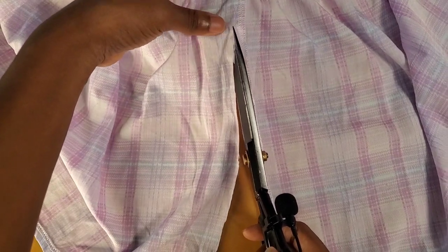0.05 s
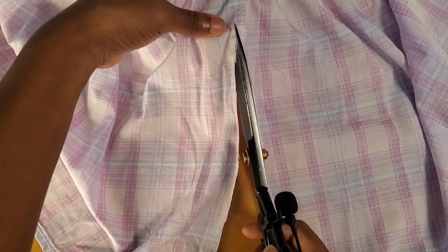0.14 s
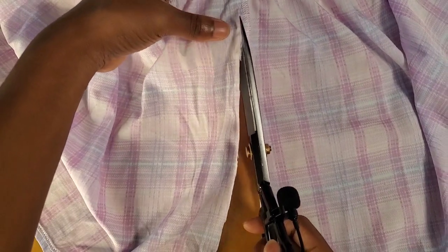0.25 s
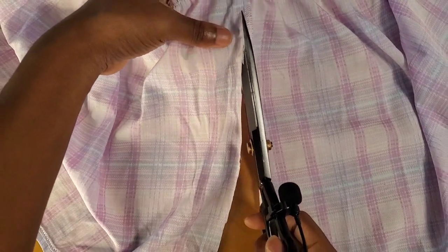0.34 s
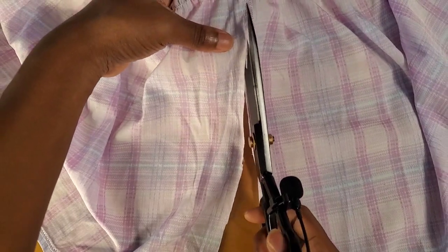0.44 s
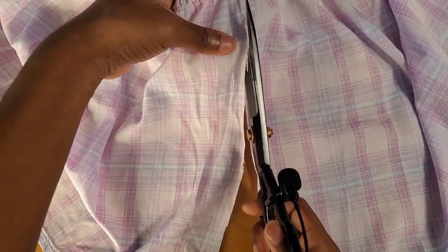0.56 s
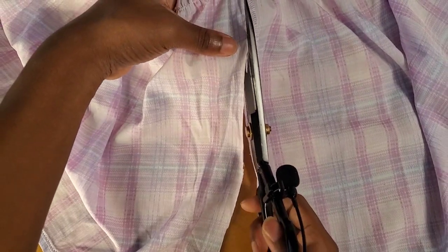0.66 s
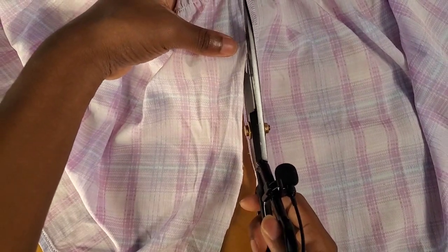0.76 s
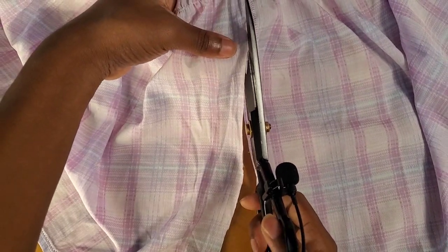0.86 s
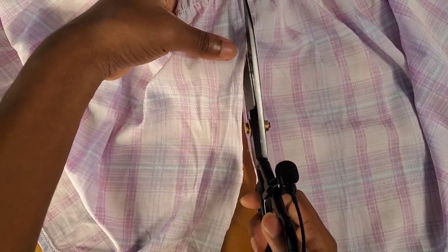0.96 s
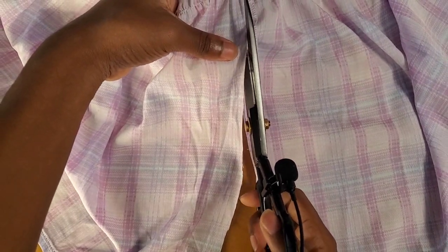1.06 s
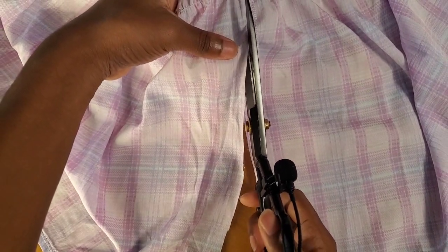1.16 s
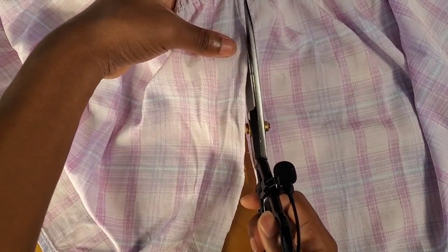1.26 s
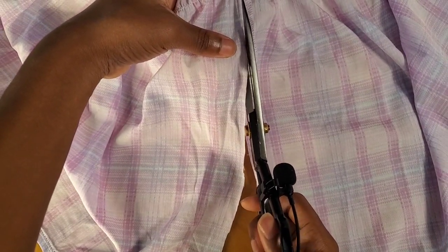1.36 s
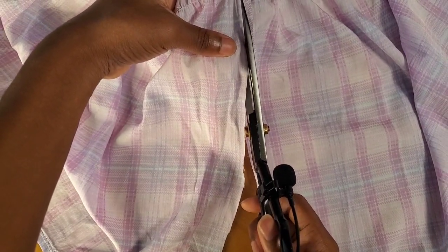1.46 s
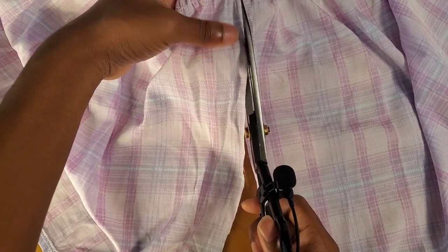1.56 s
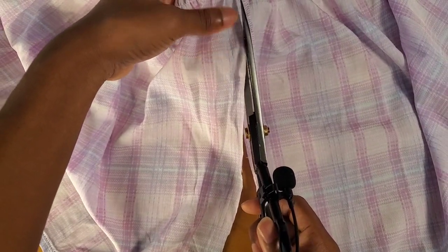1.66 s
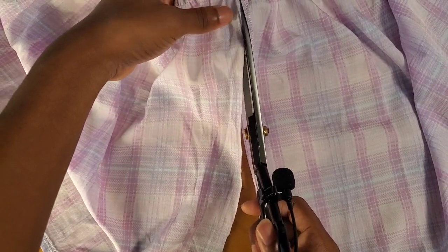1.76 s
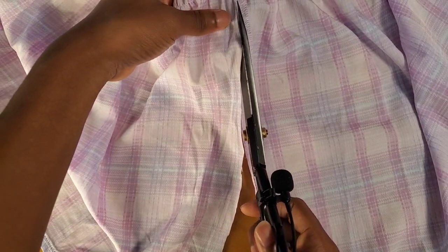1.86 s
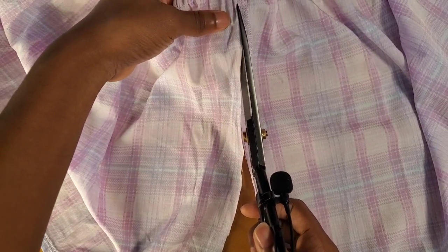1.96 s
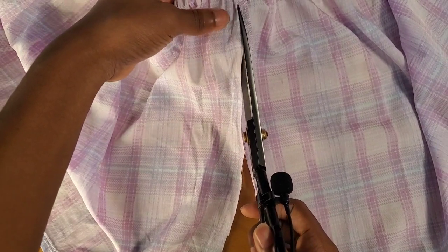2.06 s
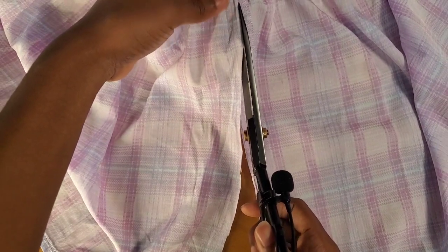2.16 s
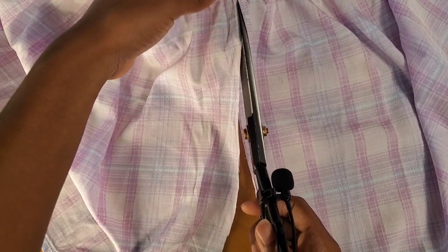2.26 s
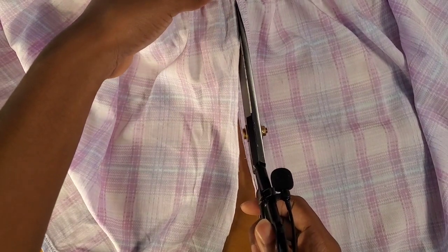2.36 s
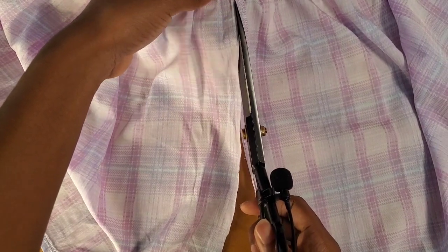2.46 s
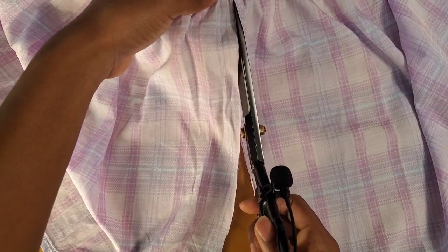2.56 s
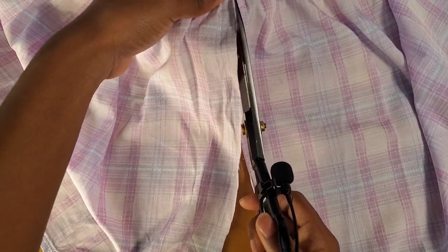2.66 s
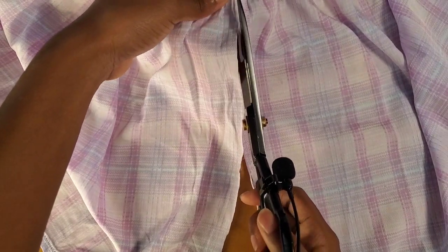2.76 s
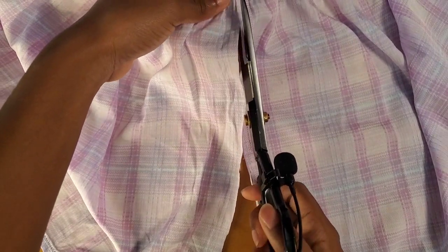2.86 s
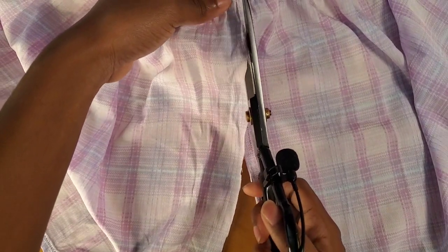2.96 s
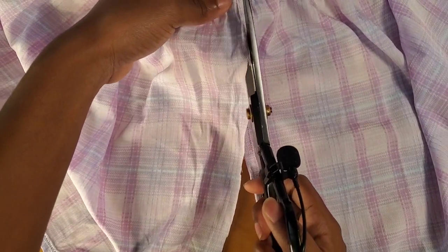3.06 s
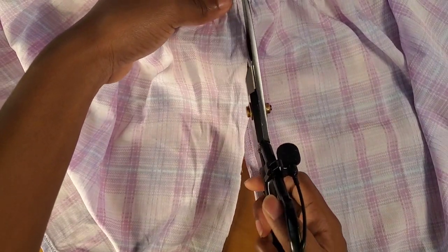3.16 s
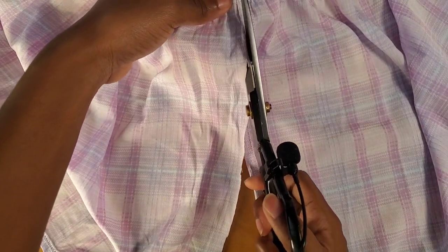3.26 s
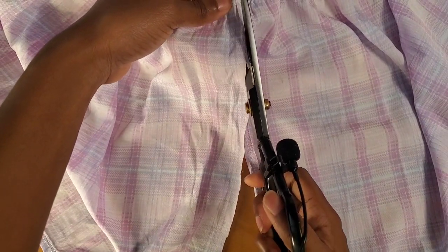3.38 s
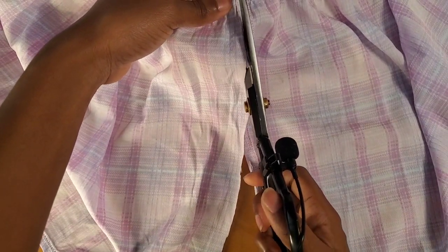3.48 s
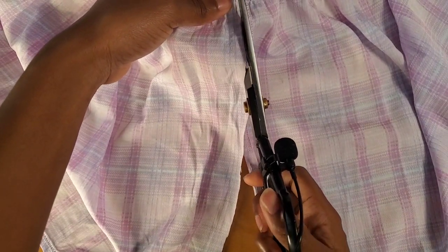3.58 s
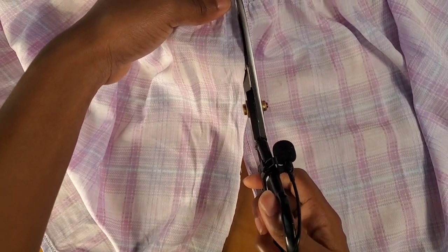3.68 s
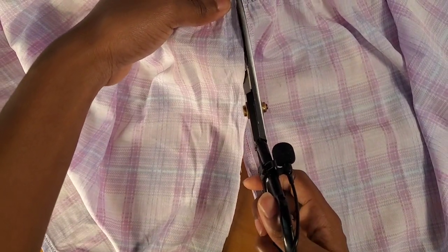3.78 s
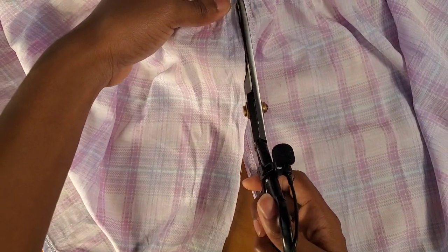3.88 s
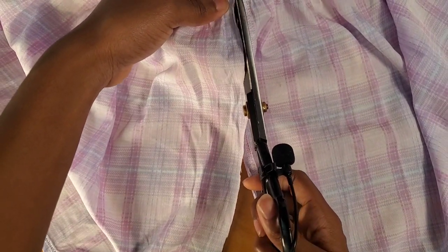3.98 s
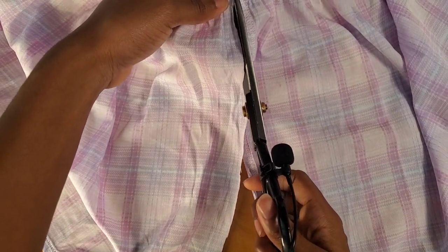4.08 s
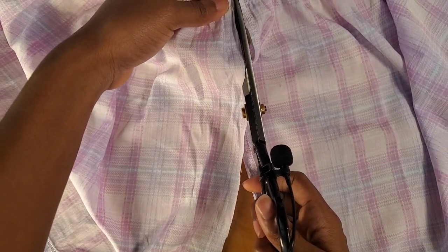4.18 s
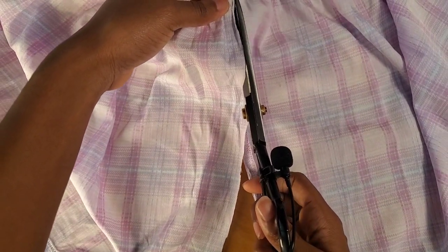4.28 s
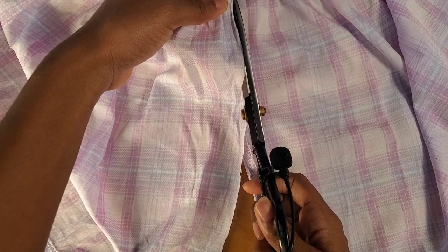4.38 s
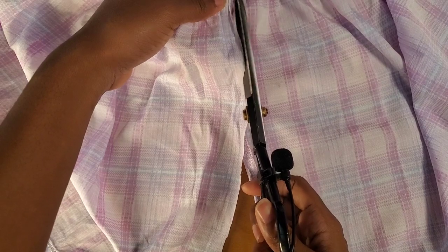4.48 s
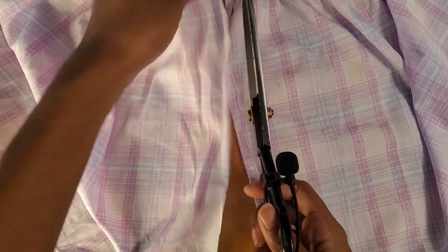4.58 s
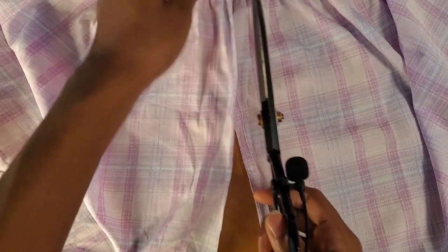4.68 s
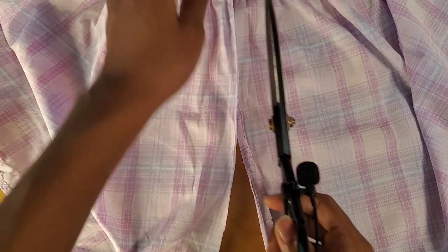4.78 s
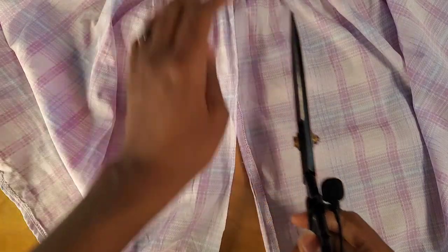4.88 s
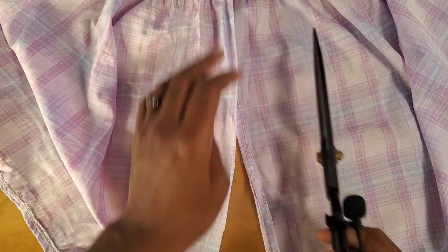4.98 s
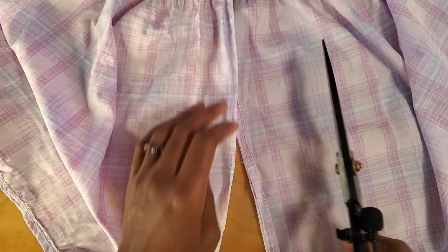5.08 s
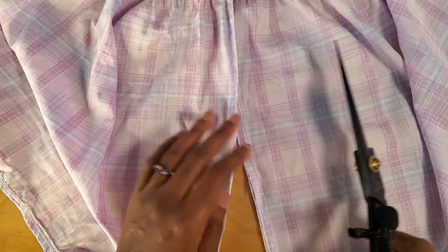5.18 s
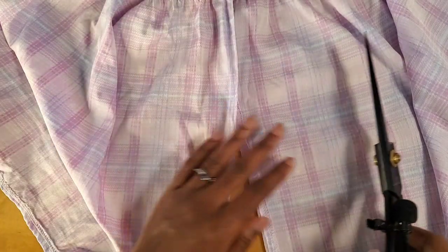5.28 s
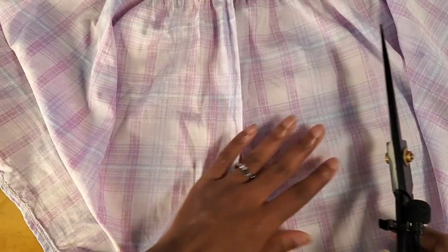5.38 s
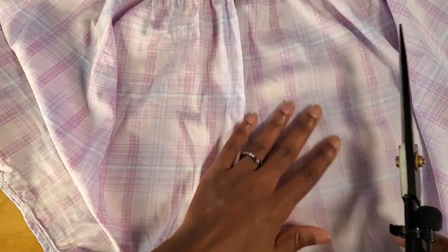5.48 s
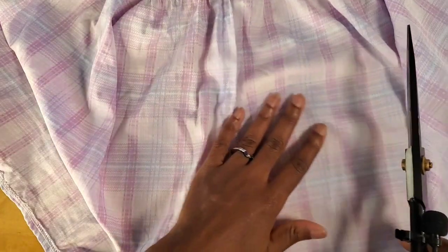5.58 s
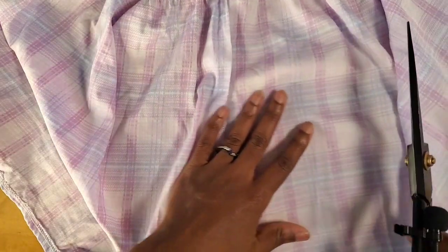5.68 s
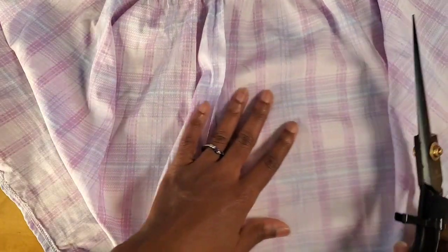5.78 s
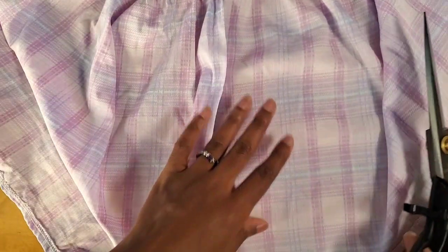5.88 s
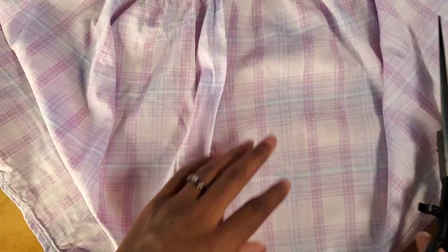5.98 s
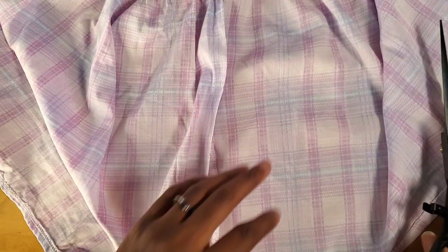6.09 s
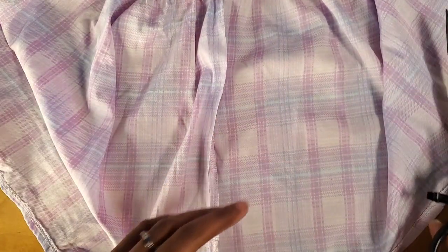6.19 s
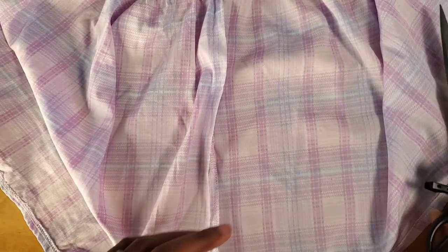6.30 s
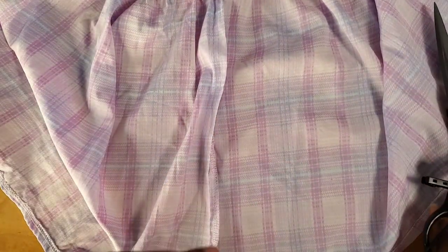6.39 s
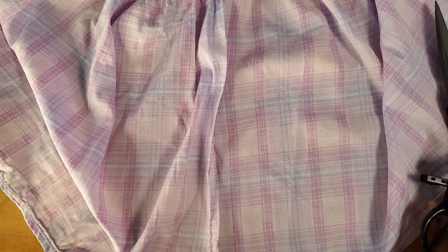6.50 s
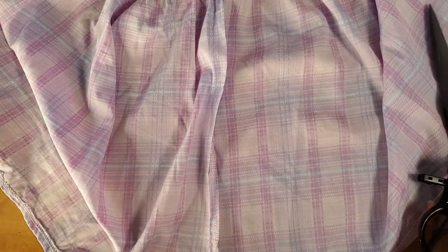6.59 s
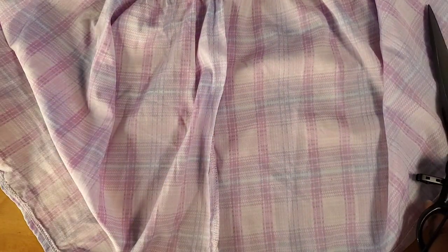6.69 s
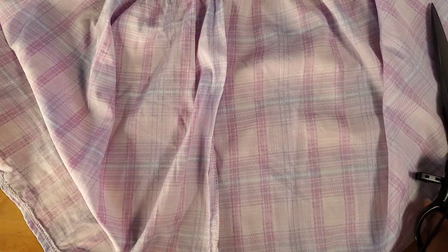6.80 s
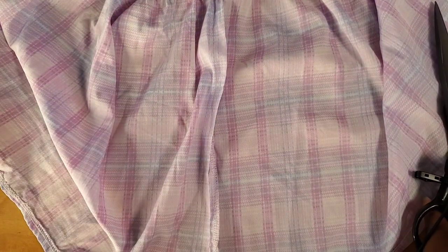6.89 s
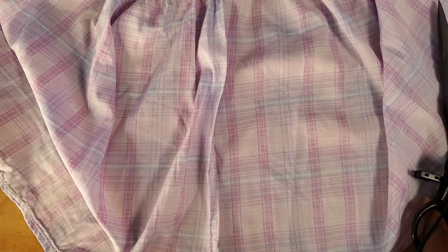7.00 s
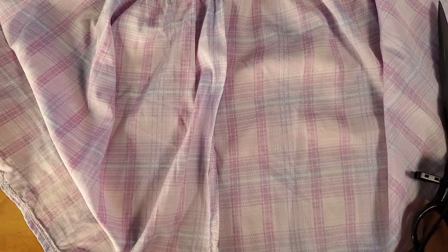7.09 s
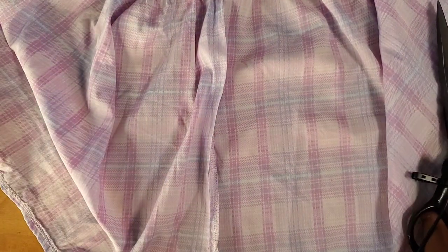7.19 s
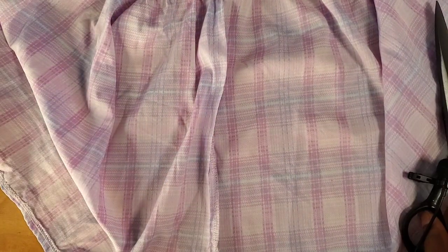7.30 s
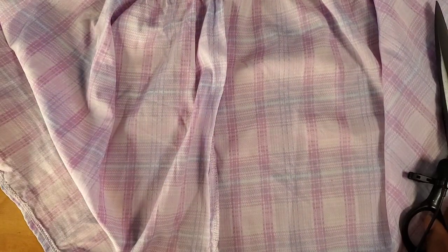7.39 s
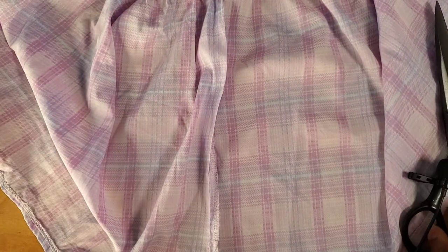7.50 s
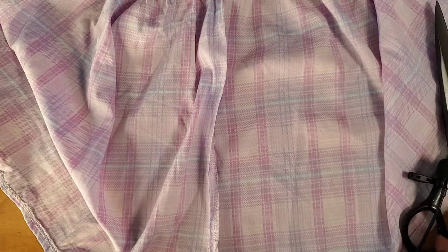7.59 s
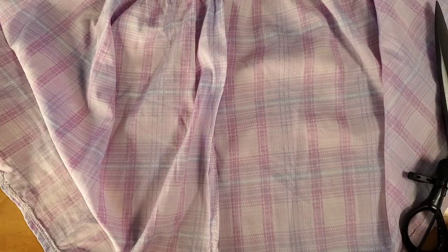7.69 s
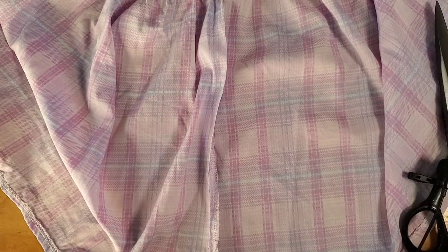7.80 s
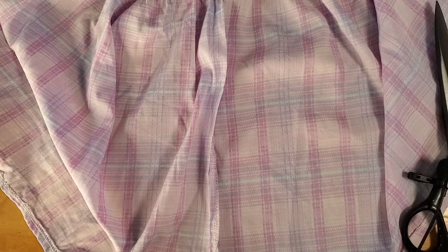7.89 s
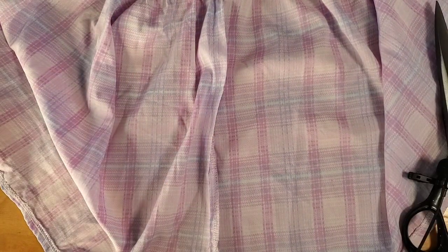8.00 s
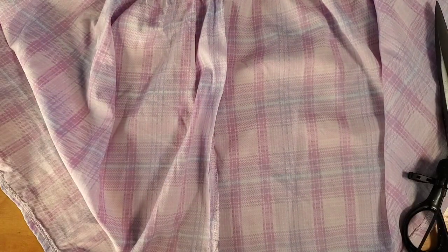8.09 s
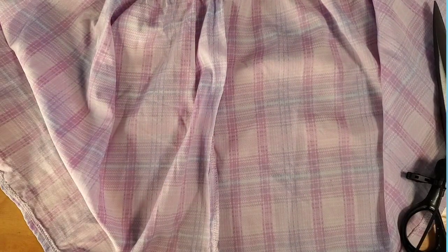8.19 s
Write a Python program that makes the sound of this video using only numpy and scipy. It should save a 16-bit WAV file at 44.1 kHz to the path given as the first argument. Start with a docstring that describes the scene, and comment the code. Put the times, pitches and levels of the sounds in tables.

```python
"""Tailor's scissors cut through a seam in four strokes, heard by a small microphone fixed to the handle.
Crackling thread impulses ring the blades and handle as resonances, and a rising force jolts the grip.
Between and during strokes the blades slide and creep as grainy noise; closing, they swish and clack,
and the pivot ticks. Then a hand smooths the cloth in filtered noise and the scissors are laid on the
wooden table, whose knocks are decaying sines. Behind it lie quiet room air and a late, low hum."""
import sys
import numpy as np
from scipy import signal
from scipy.fft import rfft, irfft, next_fast_len
from scipy.io import wavfile
from scipy.ndimage import map_coordinates

SR = 44100
rng = np.random.default_rng(int(sys.argv[2]) if len(sys.argv) > 2 else 0)


def output_pcm(signal):
    """Save a mono or channel-first signal as 16-bit PCM at the path in sys.argv[1].

    Samples are clipped to [-1, 1] before scaling.
    """
    pcm = np.clip(np.atleast_2d(signal).T, -1, 1) * 32767
    wavfile.write(sys.argv[1], SR, np.round(pcm).astype(np.int16))


N = 363825  # samples, 8.25 s

# Resonances of the steel blades. Each row: centre in Hz, width in Hz, level in dB.
BLADE_MODES = [(2573, 130, -2), (3340, 200, -3), (4860, 350, 1.5), (6900, 520, -2), (8240, 370, -4),
               (8740, 220, 1.5), (9350, 400, -3.5), (10660, 510, -6), (12304, 980, -15), (13100, 500, -8),
               (14100, 860, -6), (15600, 400, -10)]
# Colour of steel sliding on steel. Each row: frequency in Hz, relative level in dB.
SLIDE_COLOUR = [(150, -11), (290, -8.5), (420, -23), (520, -16.5), (660, -10), (780, -6.5), (980, 0.5),
                (1100, -8.5), (1400, -28), (2200, -42), (5000, -58)]
# Colour of the rumble of handling at the microphone. Each row: frequency in Hz, relative level in dB.
HANDLING_COLOUR = [(15, -12.5), (35, -2), (65, 7), (130, -5), (260, -12.5), (400, -31), (900, -55.5)]


def amp(db):
    """Decibels to gain."""
    return 10 ** (np.asarray(db) / 20)


def unit(x):
    """Scale to rms 1."""
    return x / np.sqrt(np.mean(x ** 2) + 1e-20)


def lasting(x, seconds):
    """Scale to the energy of rms 1 held for that long."""
    return x * np.sqrt(seconds * SR / (np.sum(x ** 2) + 1e-20))


def add(track, s, x):
    """Mix x into the track from time s."""
    start = max(round(s * SR), 0)
    track[start:start + len(x)] += x[:max(len(track) - start, 0)]


def wobble(rate):
    """A smooth random curve, rate knots a second."""
    knots = rng.standard_normal(int(N * rate / SR) + 4)
    return map_coordinates(knots, [np.arange(N) * rate / SR])


def colour(x, points):
    """Causal minimum-phase filter with the gain of the (Hz, dB) points."""
    m = 2 * next_fast_len(len(x))
    hz, db = np.transpose(points)
    f = np.fft.rfftfreq(m, 1 / SR)
    log_gain = np.log(amp(np.interp(np.log(f + 1), np.log(hz), db)))
    # folding the cepstrum onto positive times makes the filter causal
    cepstrum = irfft(log_gain, m)
    cepstrum[1:m // 2] *= 2
    cepstrum[m // 2 + 1:] = 0
    response = np.exp(rfft(cepstrum))
    return irfft(rfft(x, m) * response, m)[:len(x)]


def resonate(x, modes):
    """Pass x through (Hz, width Hz, dB) resonances of alternating sign."""
    m = 2 * next_fast_len(len(x))
    f = np.fft.rfftfreq(m, 1 / SR)
    response = 0
    for k, (centre, width, db) in enumerate(modes):
        damping = 1j * f * width
        response = response + (-1) ** k * amp(db) * damping / (centre * centre - f * f + damping)
    return irfft(rfft(x, m) * response, m)[:len(x)]


def grains(n, rate, spread_db):
    """Random tiny impulses of uneven size, on average rate a second, rms 1."""
    chance, size, sign = rng.random(n), rng.standard_normal(n), rng.choice([-1, 1], n)
    return unit((chance < rate / SR) * sign * amp(spread_db * np.clip(size, -2, 2)))


def spells(rows, rise_db_per_s, fall_db_per_s):
    """Gain of (start, end, dB) movements that rise, hold and die away."""
    t = np.arange(0, N, 64) / SR
    power = 0
    for start, end, db in rows:
        rise = rise_db_per_s * np.maximum(start - t, 0)
        fall = fall_db_per_s * np.maximum(t - end, 0)
        power = power + amp(db - rise - fall) ** 2
    return np.interp(np.arange(N) / SR, t, np.sqrt(power))


def swells(rows):
    """Gain of bell-shaped (middle, length, dB) movements, at half power on their edges."""
    t = np.arange(0, N, 64) / SR
    power = sum(amp(db) ** 2 * .5 ** ((2 * (t - middle) / length) ** 2) for middle, length, db in rows)
    return np.interp(np.arange(N) / SR, t, np.sqrt(power))


def room():
    """Quiet room air as coloured noise; low sines hum through the table once the scissors rest on it."""
    # Hum carried by the table. Each row: frequency in Hz, rms level in dB.
    hum_tones = [(60, -59.5), (96, -68.5)]
    # Colour of the room air. Each row: frequency in Hz, relative level in dB.
    room_colour = [(15, -38), (25, -7), (70, 2.5), (87, -9.5), (217, -28.5), (277, -25), (607, -35.5),
                   (754, -34), (887, -36.5), (7510, -49), (16000, -56)]
    air_db, laid_s = -62.5, 6.69  # rms level of the air; the scissors touch the table
    t = np.arange(N) / SR
    hum = sum(amp(db) * np.sqrt(2) * np.sin(2 * np.pi * (hz * t + rng.random())) for hz, db in hum_tones)
    contact = np.clip((t - laid_s) / .1, 0, 1)
    air = unit(colour(rng.standard_normal(N), room_colour))
    return hum * contact + amp(air_db) * air


def smoothing():
    """The palm brushes the weave; hand and scissors glide over the table with a broad swish and a rumble."""
    # The free hand gathers and smooths the cloth. Each row: middle in seconds, length in seconds, level in dB.
    sweeps = [(.93, 0.051, -76.5), (5.02, 0.36, -81), (5.41, 0.077, -69), (5.72, .26, -69.5),
              (5.82, 0.091, -59.5), (5.915, 0.036, -59), (6.17, 0.17, -75.5), (6.46, 0.4, -70.5),
              (7.22, 0.13, -67), (7.35, 0.06, -62.5)]
    # Hand and scissors glide over the covered table.
    # Each row: middle in seconds, length in seconds, swish level in dB, rumble level in dB.
    glides = np.array([(4.9, .08, -66, -50.5), (5.088, .22, -70, -70), (5.5, 0.43, -83, -63.5),
                       (5.96, 0.16, -66, -47.5), (6.186, 0.072, -60.5, -45.5), (6.42, 0.19, -74.5, -46.5),
                       (6.594, .12, -66.5, -39), (6.85, 0.22, -80.5, -45.5), (7.3, 0.16, -73, -48.5)])
    # Colour of cloth under the palm. Each row: frequency in Hz, relative level in dB.
    palm_colour = [(710, -31), (1200, -13), (2320, -12.5), (2890, -8.5), (5130, -5), (7330, -16),
                   (8630, -18), (10700, -26), (15200, -29.5), (16000, -25.5)]
    brushing = swells(sweeps)
    weave = grains(N, rate=6500, spread_db=4.5) * amp(1.7 * wobble(45))
    # a brisker sweep of the palm is brighter
    brisk = amp(-25) * np.minimum(brushing / amp(-62), 1) ** 2
    bright = unit(colour(weave, [(3000, -23), (7000, 1), (9000, -1.5), (15000, -21)]))
    palm = unit(colour(weave, palm_colour)) + brisk * bright
    swish_colour = [(200, -2.5), (500, -4.0), (750, 5), (1100, -1), (1900, -14.5), (3500, -32.0)]
    swish = unit(colour(rng.standard_normal(N), swish_colour))
    rumble = colour(grains(N, rate=5200, spread_db=2.0), HANDLING_COLOUR)
    rumble = unit(amp(4.4 * wobble(75)) * rumble)
    return brushing * palm + swells(glides[:, [0, 1, 2]]) * swish + swells(glides[:, [0, 1, 3]]) * rumble


def knocks():
    """Blows on the cloth-covered table; softer contact gives a duller sound that dies sooner."""
    # Knocks on the table and handle. Each row: time in seconds, level in dB, hardness in dB of treble.
    blows = [(4.903, -42, -16), (5.238, -48, -19), (5.696, -39.5, -26), (5.902, -31, -6),
             (6.215, -30.5, -23.5), (6.685, -0.5, -0.5), (6.722, -13, -15), (7.096, -13.5, -6),
             (7.356, -21.5, -14.5)]
    # Scissors on the table. Each row: frequency in Hz, mean level in dB, t60 in seconds for the hardest blows.
    table_modes = [(102, 0, .17), (151, -3, .16), (205, -4, .27), (301, 0, .13), (355, -1, .14),
                   (420, -10, .13), (581, -15, .11), (721, -11, .1), (840, -20, .11), (950, -18, .13)]
    # Long ring of the handle loops, with the same columns: Hz, dB, seconds.
    loop_modes = [(270, -42, 2.4)]
    # Colour of the thud. Each row: frequency in Hz, relative level in dB.
    thud_colour = [(25, -17), (80, 3), (350, -4.5), (520, -14), (1000, -14.5), (1600, -28.5), (3000, -42),
                   (8500, -48.5), (16000, -67)]
    out, t = np.zeros(N), np.arange(2 * SR) / SR
    for s, db, hard_db in blows:
        wood = 0
        for hz, level, t60 in table_modes + loop_modes:
            wood = wood + amp(level + rng.normal(0, 1) - 60 * t / t60) * np.sin(2 * np.pi * hz * t)
        # a brief crush of cloth, then scattered answers from the room
        crush = rng.standard_normal(len(t)) * amp(-60 * t / .025)
        echoes = grains(len(t), rate=1200, spread_db=1.5) * amp(-16 - 60 * t / .2)
        damping = amp(21 * min(hard_db + 5, 0) * t)
        knock = damping * (unit(wood) + unit(colour(crush + echoes, thud_colour)))
        knock = colour(knock, [(25, -1), (80, 6.5), (200, 4.5), (800, hard_db), (4000, 4 * hard_db)])
        add(out, s + .002, amp(db) * lasting(knock, 0.0022))
    return out


def sliding():
    """The blades slide in small slips, brushing the cloth, while the grip rumbles."""
    # The blades slide open or creep along the cloth.
    # Each row: start in seconds, end in seconds, scrape drive in dB, grip rumble in dB.
    slides = np.array([(0, 0.123, -57.5, -49), (0.162, 0.345, -59.5, -52), (0.374, 0.617, -53, -44.5),
                       (.7, 0.787, -81, -63), (.95, 1.084, -74, -57.5), (1.24, 1.551, -55, -47),
                       (1.747, 2.052, -41.5, -45.5), (2.25, 2.38, -78.5, -60.5), (2.584, 2.653, -38, -43.5),
                       (2.698, 2.917, -61.5, -51.5), (2.92, 3.119, -64, -50), (3.66, 4.008, -40, -35),
                       (4.14, 4.22, -57, -49), (4.314, 4.359, -48, -49), (4.59, 4.72, -75, -49)])
    # Colour of cloth on the blades. Each row: frequency in Hz, relative level in dB.
    blade_cloth_colour = [(880, -30), (1500, -5.5), (2160, -7.5), (2460, -5), (2860, -6), (5220, -9.5),
                          (6000, -13), (8920, -11), (10600, -18), (15200, -20), (16000, -24)]
    rise, scrape_fall, grip_fall = 650.5, 379.5, 201.5  # dB per second
    brush_db = -19  # cloth on the blades, relative to the scrape drive
    rest_brush_db, rest_grip_db = -81.5, -65  # a hand holding the scissors is never quite still
    lift_s = 4.85  # the blades leave the cloth
    slips = wobble(75)
    in_cloth = np.clip((lift_s - np.arange(N) / SR) / 0.083, 0, 1)
    speed = spells(slides[:, [0, 1, 2]], rise, scrape_fall)
    effort = spells(slides[:, [0, 1, 3]], rise, grip_fall)
    grip = unit(amp(3.4 * slips) * colour(grains(N, rate=8400, spread_db=2.5), HANDLING_COLOUR))
    # a faster slide runs more evenly
    catch_db = np.interp(speed, amp([-60, -40]), [4.5, 2.2])
    scrape = unit(colour(grains(N, rate=1400, spread_db=7), SLIDE_COLOUR))
    scrape = amp(catch_db * slips - 3.5) * scrape
    weave = grains(N, rate=8700, spread_db=5) * amp(0.55 * slips)
    blade_ring = unit(resonate(weave, [(5000, 1100, -0.5), (9100, 290, -6)]))
    brush = unit(unit(colour(weave, blade_cloth_colour)) + amp(-4.5) * blade_ring)
    stirring = amp(rest_brush_db + 1.4 * wobble(4.6)) * in_cloth
    brush_gain = np.hypot(amp(brush_db) * speed, stirring)
    grip_gain = np.hypot(effort, amp(rest_grip_db) * in_cloth)
    return speed * scrape + brush_gain * brush + grip_gain * grip


def ticks():
    """The pivot catches and lets go: a short noise burst in the slide's colour, with ringing blades on top."""
    # Small ticks of the pivot. Each row: time in seconds, peak in dB, treble in dB relative to the body.
    slips = [(0.113, -43, -15.5), (0.247, -49, -25), (0.603, -41.5, -22), (1.022, -47, -26),
             (1.251, -35, -27), (1.269, -34, -19), (1.283, -31, -25), (1.527, -36, -14), (2.662, -25, -31),
             (2.809, -43, -38), (2.855, -42, -21), (4.436, -48.5, -29), (4.509, -58, -18), (4.591, -44, -4),
             (4.733, -58.5, -22), (4.872, -52, -9)]
    out, t = np.zeros(N), np.arange(SR // 10) / SR
    for s, db, treble_db in slips:
        slip = rng.standard_normal(len(t)) * amp(-60 * t / 0.019)
        treble = unit(colour(resonate(slip, BLADE_MODES), [(9000, -1.5), (13000, -5)]))
        tick = unit(colour(slip, SLIDE_COLOUR)) + amp(treble_db) * treble
        add(out, s, amp(db) * tick / np.abs(tick).max())
    return out


def closing():
    """The bare edges swish past each other, then the handles meet with a short, hard clack and a jolt."""
    # Bare edges near the tips. Each row: centre in Hz, width in Hz, level in dB.
    tip_modes = [(5298, 690, -10.5), (8000, 480, -3.5), (8700, 340, 1.5), (14200, 630, -6.5)]
    shut_s, clack_db, swish_db = 4.349, -2.5, -39.5  # moment of the clack, its peak, base level of the swish
    out, lead = np.zeros(N), .1
    t = np.arange(SR // 3) / SR - lead
    speed_db = np.interp(t, [-.1, -.05, -.037, -.015, 0, .03], [-30, -20, -2, 1, -6, -90])
    edges = unit(resonate(grains(len(t), rate=5500, spread_db=8), tip_modes))
    swish = amp(swish_db + speed_db + 3.2 * wobble(150)[:len(t)]) * edges
    blow = (t >= 0) * amp(-60 * np.abs(t) / 0.0034)
    handle_modes = [(72, 20, 8.5), (262.2, 60, 8.5), (390, 450, 2), (680, 280, 3.5), (3600, 1800, -12)]
    clack = resonate(blow, handle_modes)
    add(out, shut_s - lead, swish + amp(clack_db) * clack / np.abs(clack).max())
    return out


def bite(t, length, crunch_db, ring_db, sharp_db, ring_hz):
    """A bunch of threads loads the blades, crackles apart and lets the handle spring back."""
    # The hand-held scissors rocking. Each row: centre in Hz, width in Hz, level in dB.
    grip_modes = [(60.5, 55, 3.5), (110, 94, -1.5), (219, 63, 0.5), (280, 110, -8.5)]
    # Colour of bare fibre noise. Each row: frequency in Hz, relative level in dB.
    fibre_colour = [(600, -39), (1400, 3), (1900, 5.5), (2200, -6.5), (3600, -9.5), (6000, -10.5),
                    (10000, -6), (12200, -18.5), (15200, -9.5)]
    fibre_db, spread_db = -12, 3  # fibre noise under the blades' ring; spread of the modes from bite to bite
    recoil_base_db, recoil_grows = -14, .35  # jolt at full-scale crunch; dB of jolt per dB of crunch
    # the crackle swells as the edges sink in and stops dead when the bunch parts
    shear_s = [-.02, -.004, 0, .4 * length, length, length + .003, length + .11]
    shear = amp(np.interp(t, shear_s, [-70, -28, -7, 0, -2, -27, -90]))
    # fine fibres crackle; whole threads part one after another with bigger snaps
    fibres = grains(len(t), rate=3500, spread_db=6.5)
    threads = grains(len(t), rate=420, spread_db=3)
    snaps = (fibres + threads) * shear
    # the balance of the blade modes varies at random from bite to bite
    balance = rng.standard_normal(len(BLADE_MODES))
    modes = [(hz, width, db + spread_db * chance) for (hz, width, db), chance in zip(BLADE_MODES, balance)]
    steel = unit(resonate(snaps, modes)) + amp(fibre_db) * unit(colour(snaps, fibre_colour))
    steel = colour(steel, [(2200, -.3 * sharp_db), (5500, 0.0015), (9000, sharp_db), (14000, 2.0 * sharp_db)])
    # the handle rings in three modes, pitched by the squeeze's reference
    ring = resonate(snaps, [(ring_hz * .55, 200, -10), (ring_hz * .77, 120, -4), (ring_hz * 1.07, 170, 0)])
    ring = colour(ring, [(100, -4.5), (480, -6), (660, 1.0), (1120, -0.5),
                         (1400, -12.5), (1850, -4.5), (2300, -21.5), (8000, -43.5)])
    # force builds up, then drops as the last thread goes
    force = np.clip(t / length, 0, 1) * np.clip((length - t) / 0.0011 + 1, 0, 1)
    shaking = unit(colour(snaps, [(30, -5.5), (300, -4), (900, -29.0)]))
    recoil = resonate(unit(force) + shaking, grip_modes)
    recoil = colour(recoil, [(20, -15), (70, -5.5), (125, -0.5), (250, -5), (350, -0.5), (550, -9.5), (2000, -42.5)])
    # a stronger bite jolts the handle more; the faintest barely move it
    recoil_db = min(recoil_base_db + recoil_grows * crunch_db, ring_db + 2.5)
    parts = [(steel, crunch_db), (ring, ring_db), (recoil, recoil_db)]
    return sum(amp(db) * lasting(part, length) for part, db in parts)


def cutting():
    """Each squeeze parts a run of small threads and a few thick bunches, all in the colour of that seam stretch."""
    # Thick bunches of threads giving way.
    # Each row: start in seconds, length in seconds, crunch level in dB, handle ring level in dB.
    bunches = [(1.303, .009, -44, -26.5), (1.332, 0.0082, -35, -30.5), (1.349, 0.014, -38.5, -31),
               (1.387, 0.018, -41, -25.5), (1.419, 0.015, -35, -30), (1.459, 0.0039, -46, -35.5),
               (1.48, 0.0076, -38, -27), (1.716, 0.011, -38, -16), (1.79, 0.015, -35, -25),
               (1.845, 0.011, -33.5, -25.5), (1.866, 0.011, -35, -27), (1.897, 0.011, -33, -23),
               (1.919, .008, -29, -22.5), (1.957, 0.012, -23, -15.5), (1.979, 0.01, -24, -29),
               (1.998, .017, -24.5, -18.5), (2.031, 0.0072, -21.5, -16.5), (2.057, 0.0082, -34, -24),
               (3.685, 0.0071, -36, -26), (3.734, 0.0055, -32, -21), (3.755, .012, -33.5, -24),
               (3.783, .011, -33.5, -24), (3.83, 0.013, -37.5, -22.5), (3.876, 0.005, -33, -11.5),
               (3.959, .011, -32.5, -16), (4.002, .011, -32, -21), (4.037, 0.0078, -43.5, -36.5),
               (4.111, 0.0035, -43, -39), (4.139, 0.0055, -34, -30.5), (4.172, 0.0091, -33, -30.5),
               (4.203, 0.005, -24, -22.5), (4.341, 0.0085, -21, -16)]
    # Squeezes of the handles, each through one stretch of seam. Each row: start in seconds, end in seconds,
    # mean level of small threads in dB, sharpness in dB at 9 kHz, reference for the handle's modes in Hz.
    squeezes = [(1.315, 1.345, -41.5, 3.5, 934), (1.389, 1.49, -62, -1, 1030),
                (1.747, 1.91, -41.5, -4.5, 870), (1.971, 2.05, -40.5, 2, 800), (3.701, 3.81, -40, 2.5, 930),
                (3.809, 3.908, -39, -3.5, 870), (3.958, 4.04, -42.5, -5.5, 890),
                (4.121, 4.213, -62.5, 2.5, 920)]
    threads_per_s, thread_s = 65, .013  # small threads: rate, length of each
    scatter_db, thread_ring_db = 2, 7.5  # small threads: spread of strength, handle ring over crunch
    out, lead = np.zeros(N), .02
    t = np.arange(SR // 7) / SR - lead
    for s, length, crunch_db, ring_db in bunches:
        # the squeeze nearest in time lends its colour
        *_, sharp_db, ring_hz = min(squeezes, key=lambda row: max(row[0] - s, s - row[1]))
        add(out, s - lead, bite(t, length, crunch_db, ring_db, sharp_db, ring_hz))
    for start, end, thread_db, sharp_db, ring_hz in squeezes:
        for s in np.arange(start, end - thread_s / 2, 1 / threads_per_s):
            db = thread_db + scatter_db * rng.standard_normal()
            early = rng.random() / threads_per_s / 2
            add(out, s - early - lead, bite(t, thread_s, db, db + thread_ring_db, sharp_db, ring_hz))
    return out


def scene():
    """Everything reaches the one microphone on the handle."""
    background = room() + smoothing() + knocks()
    scissors = sliding() + ticks() + closing() + cutting()
    return (background + scissors)[None]


def record(dry):
    """The recorder thins the deepest bass, clips at full scale and rolls off steeply above its band limit."""
    top_hz = 15700
    dry = signal.sosfilt(signal.butter(2, 32, "high", fs=SR, output="sos"), dry)
    m = next_fast_len(N + SR // 2)
    above = np.clip((np.fft.rfftfreq(m, 1 / SR) - top_hz) / 900, 0, 1.2)
    return irfft(rfft(np.clip(dry, -1, 1), m) * amp(-80 * above ** 2), m)[..., :N]


dry = scene()
out = record(dry)
output_pcm(out)
```